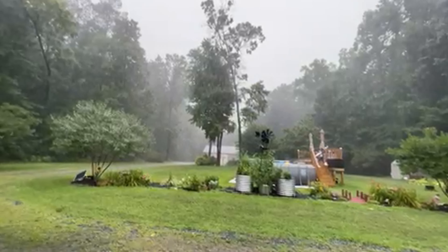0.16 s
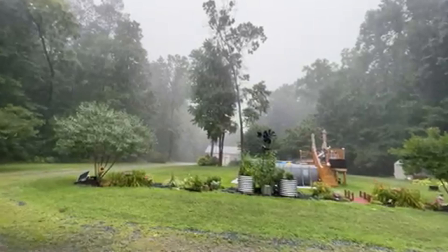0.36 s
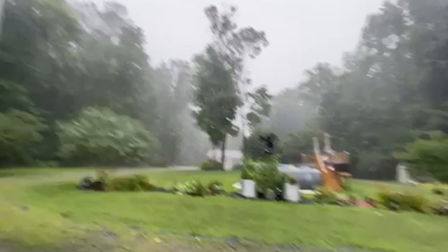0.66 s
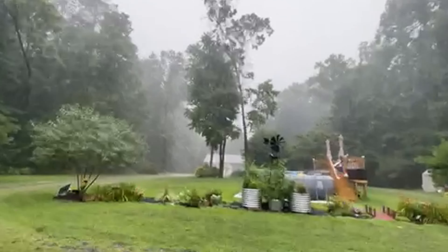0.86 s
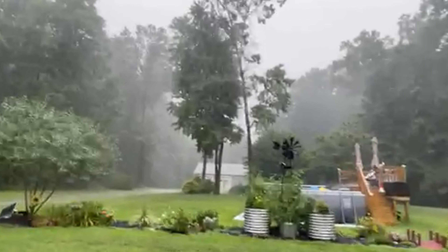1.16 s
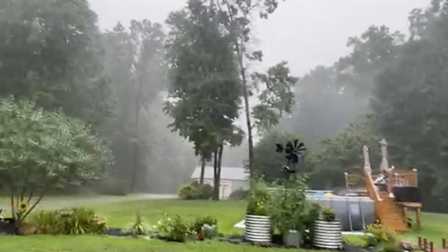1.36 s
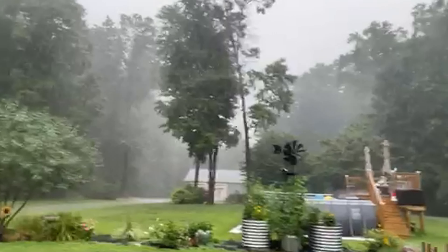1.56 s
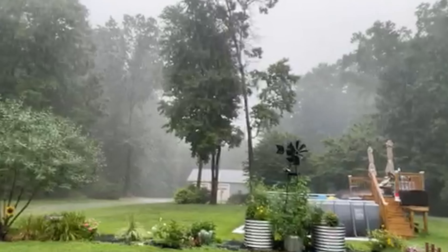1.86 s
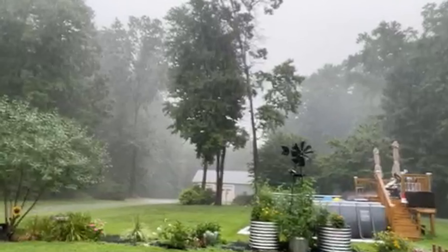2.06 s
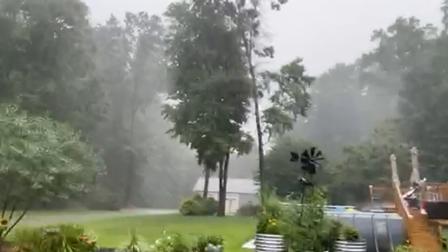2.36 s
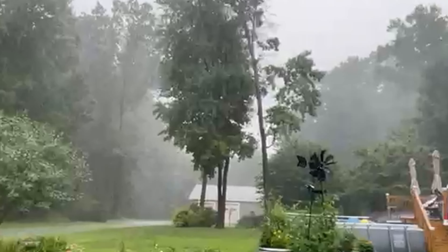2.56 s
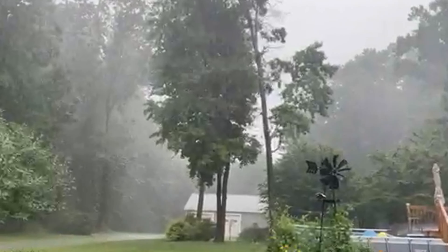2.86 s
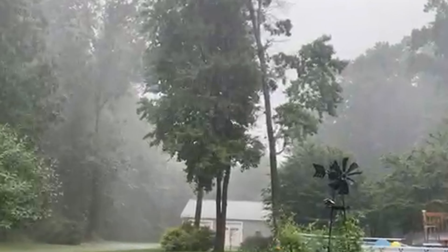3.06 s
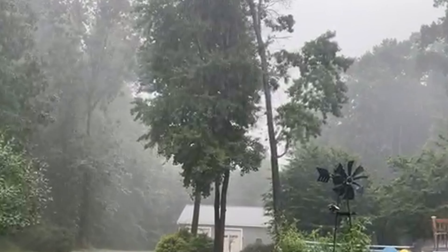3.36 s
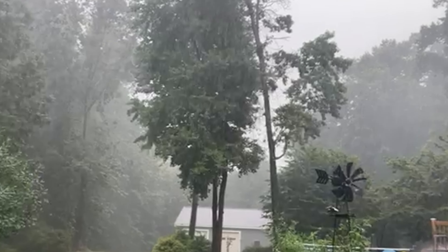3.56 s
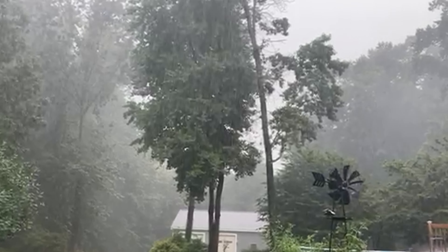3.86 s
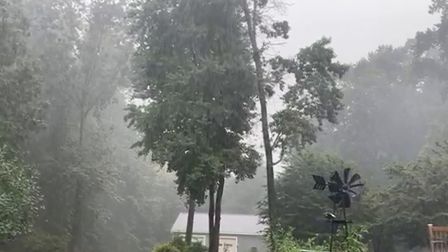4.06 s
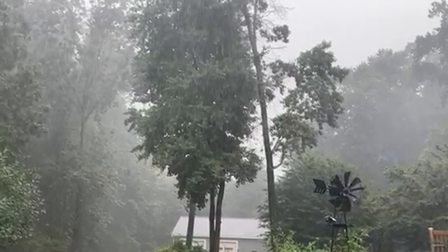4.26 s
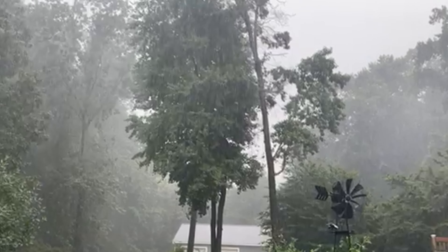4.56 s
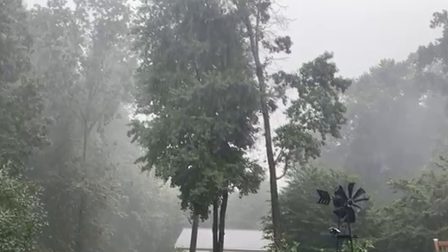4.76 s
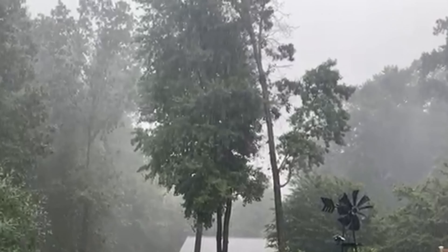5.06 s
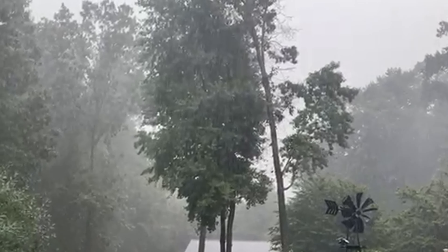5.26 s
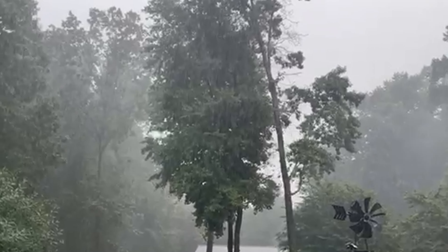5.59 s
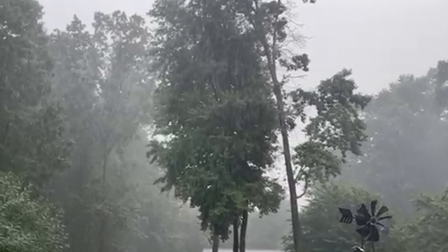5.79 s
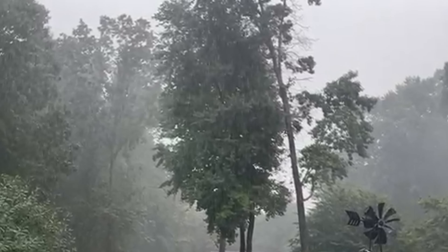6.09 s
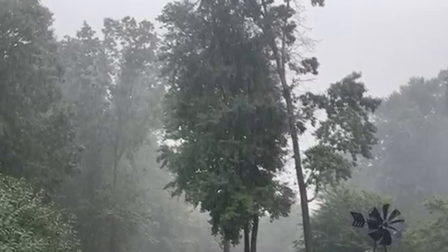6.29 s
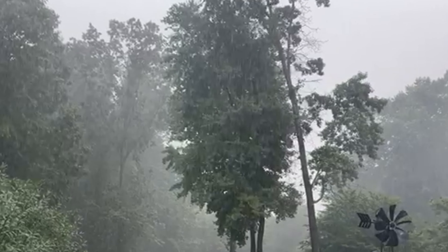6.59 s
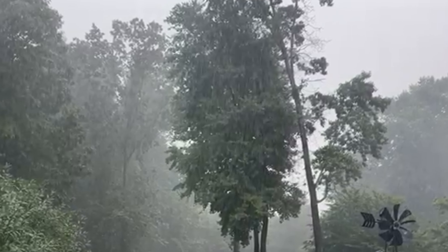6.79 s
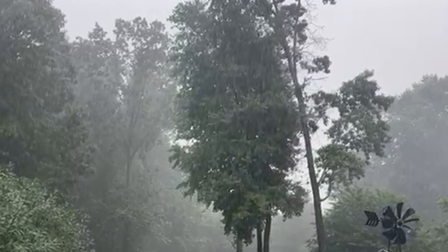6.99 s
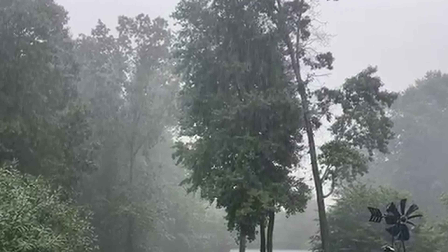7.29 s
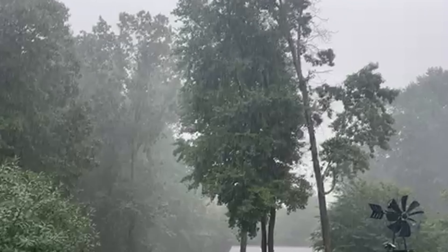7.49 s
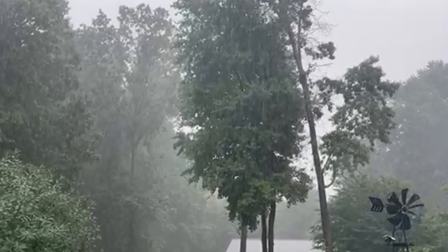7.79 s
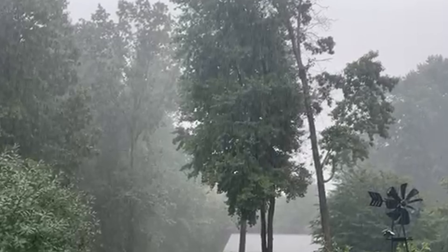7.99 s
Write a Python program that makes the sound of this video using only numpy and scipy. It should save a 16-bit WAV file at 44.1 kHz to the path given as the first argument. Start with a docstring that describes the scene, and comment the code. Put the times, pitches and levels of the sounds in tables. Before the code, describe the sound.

Heavy rain hisses steadily on a lawn and trees over a low roar, with a few ringing gutter drips.

```python
"""A downpour on lawn, gravel and trees, heard from under a porch through a phone's microphone array.
Countless impacts superpose into a hiss, bubbles ring in puddles, and a low roar swells beneath as
water drums on the roof. Run-off splashes close by on the right, drips ring the gutter, single drops tick.
The array narrows from a wide image to a forward beam: the splash fades and both sides grow alike."""
import sys
import numpy as np
from scipy import signal
from scipy.fft import rfft, irfft, next_fast_len
from scipy.io import wavfile
from scipy.ndimage import uniform_filter1d

SR = 44100
rng = np.random.default_rng(int(sys.argv[2]) if len(sys.argv) > 2 else 0)


def log_audio(samples):
    """Write samples as a 16-bit WAV file to the path given in sys.argv[1]."""
    # one column per channel
    frames = np.atleast_2d(samples).T
    # limit to full scale, then quantise
    limited = np.clip(frames, -1, 1)
    pcm = np.round(limited * 32767).astype(np.int16)
    wavfile.write(sys.argv[1], SR, pcm)


N = 358974
SIZE = next_fast_len(N, True)
HZ = np.maximum(np.arange(SIZE // 2 + 1) * SR / SIZE, 1)
RUMBLE_HZ, BOOM_HZ, TREBLE_HZ, TOP_HZ = 76.4, 169, 7280, 13000  # band edges

# The storm's strength. Each row: time in seconds, gains in dB of rain, roof drumming, boom and rumble.
STORM_GAINS = [(0.0, -18.5, -24, -24.5, -28), (.55, -16.5, -23, -33, -32), (.95, -15, -21.5, -27, -31),
               (1.27, -17.5, -22.5, -31, -34), (1.42, -16.5, -19.5, -22, -29),
               (1.7, -16, -19.5, -29.5, -27), (2.2, -14, -17.5, -23.5, -28),
               (2.7, -14.5, -17.5, -24.5, -21), (3.3, -16.5, -18.5, -27, -29.5),
               (3.7, -15, -18.5, -24, -32), (4.25, -15.5, -18.5, -26.5, -28),
               (4.6, -15.5, -19.5, -21, -28.5), (5.0, -15, -18.5, -21, -30), (5.25, -15, -18.5, -24, -30),
               (5.5, -16, -17, -22, -28), (5.7, -15, -15.5, -17.5, -32), (6.1, -16.5, -18, -26.5, -22),
               (6.3, -16, -17.5, -20, -25), (6.5, -16, -14, -15, -24), (6.72, -16.5, -17, -14.5, -25),
               (6.85, -15.5, -18.5, -21, -24.5), (7.3, -15, -16, -20, -23.5), (7.6, -16, -20.5, -21.5, -30),
               (8.02, -14.5, -16, -16.5, -34), (8.14, -18.5, -23, -22, -33)]
# The array's aim. Each row: time in seconds, focus (0 wide, 1 narrow), treble focus, splash gain in dB.
BEAM_AIM = [(0, 0, 0, -17.5), (.7, 0, 0, -15.5), (1.2, 0.01, 0.4, -19), (1.4, 0.027, 1, -20),
            (2.0, 0.15, 1, -18.5), (2.4, 0.22, 0.94, -16.5), (2.9, 0.99, 0.98, -62), (3.5, 1, 1, -57),
            (8.14, 1, 0.95, -60)]
# The hiss. Each row: frequency in Hz, relative spectral level in dB when wide, the same when narrow.
RAIN_SPECTRUM = [(198, -16.5, -22.5), (498, -1.5, 0), (810, -1, -4), (930, -1.5, -2), (1460, 0, -3.5),
                 (1465, -1, -3), (1640, -1, -3.5), (2720, -5, -1.5), (3760, -8.5, -6.5),
                 (5330, -10.5, -7.5), (6400, -10.5, -9), (8050, -11.5, -12), (10000, -13.5, -11),
                 (12000, -15.5, -15), (13300, -22, -17.5), (15100, -19, -20.5)]
# Likeness of the two ports. Each row: frequency in Hz, coherence (0 to 1) when wide, the same when narrow.
COHERENCE = [(30, .7, 0.86), (60, 1, 1), (231, 0.83, 0.95), (400, 0.62, 0.88), (680, 0.07, 0.61),
             (1320, 0, 0.13), (1990, 0, 0.56), (2600, 0, 0.92), (3300, 0.06, 1), (4970, 0.34, 1),
             (5600, 0.3, 0.86), (6100, 0.5, 0.68), (6620, 0.85, 1), (7800, 1, 1), (9600, 0.4, 1),
             (9500, 0.6, 0.2), (9900, 0.6, 1), (10200, 0.96, 1), (12200, 1, 0.8), (12800, .5, 0.6)]
# The highest hiss loosens late. Each row: time in seconds, coherence (0 to 1).
TOP_COHERENCE = [(0, 1), (3.3, 0.97), (3.6, 0.25), (6.4, 0.6), (6.8, 0), (8.14, 0)]
# Phase of the sound both ports share. Each row: frequency in Hz, lead of the right port in half turns.
PORT_PHASE = [(2500, 0), (5000, 0), (5500, 0.43), (6300, 0.32), (6900, 1), (8800, 1), (9300, 0.48),
              (10000, 0.6), (10400, 0), (12250, 0), (12800, -0.59), (13500, -1)]
# Balance of the ports. Each row: frequency in Hz, left minus right in dB.
PORT_BALANCE = [(60, 0), (120, -2), (400, -0.5), (900, -1), (2000, 3), (3000, 0)]
# Resonances of the porch. Each row: frequency in Hz, width in Hz, peak gain in dB.
PORCH_MODES = [(126, 26, 5), (404, 18, 6), (520, 25, 2.5), (745, 60, 2), (1535, 70, 3.5), (2200, 140, 2)]
# The roar, before its roll-off and band gains. Each row: frequency in Hz, relative spectral level in dB.
ROAR_SPECTRUM = [(13, -50), (24, -19), (63, -2), (120, -2), (174, -4.5), (212, -1.5), (338, -3), (408, -6),
                 (469, -8), (735, -9.5), (830, -32), (1170, -50), (1980, -120)]
# Run-off on gravel. Each row: frequency in Hz, relative spectral level in dB.
SPLASH_SPECTRUM = [(300, -42), (900, 2.5), (2000, -5), (3500, -2), (4600, -2.5), (5600, 2.5), (7000, -0.5),
                   (8500, -1), (11000, -39)]
# Acoustic shadow on the splash. Each row: frequency in Hz, gain at the far port in dB.
FAR_PORT_SHADOW = [(500, -4), (2000, -5.5), (4000, -19), (6000, -23)]
# Heavy drips on the gutter. Each row: start in seconds, level in dB, left minus right in dB.
DRIP_IMPACTS = [(.86, -36, 2), (2.275, -19, 8), (2.41, -24, 3), (2.6, -18, 4), (2.69, -19, 7),
                (3.04, -25, 6), (3.68, -22, 6), (4.95, -28, 3), (5.2, -35, 3)]
# Modes of the gutter. Each row: frequency in Hz, gain in dB, 60 dB decay time in seconds.
GUTTER_MODES = [(1505, 0, .35), (1550, -1, .35), (1880, -7, .25)]
# Brief dips in the level. Each row: start in seconds, depth in dB.
LEVEL_DIPS = [(1.06, 1), (1.74, 3), (2.06, 1.5), (3.17, 1.5), (3.35, -0.5), (4.295, 2.5), (5.52, 0),
              (6.34, 0.5), (6.53, 1), (6.87, 1.5), (7.1, 0.5), (7.54, 1.5)]
# Single drops close by. Each row: start in seconds, level in dB, left minus right in dB.
TICK_IMPACTS = [(3.7078, -11, 5), (4.2922, -9, 3), (5.899, -24, 0), (3.757, -19, 0), (4.7252, -23, 0),
                (7.0793, -18, 0.5)]
# Modes of a tick. Each row: frequency in Hz, gain in dB, 60 dB decay time in seconds.
TICK_MODES = [(10800, 3, 0.0064), (12800, -1, .003), (14800, -3, .003)]


def from_db(db):
    """Amplitude grows tenfold for every 20 dB."""
    return 10 ** (np.asarray(db) / 20)


def unit_rms(x):
    """Normalisation to a mean power of one."""
    return x / np.sqrt(np.mean(x ** 2) + 1e-20)


def in_time(rows):
    """Linear interpolation of each column over time."""
    times, *columns = np.transpose(rows)
    return [np.interp(np.arange(N) / SR, times, column) for column in columns]


def at_hz(rows, hz, column=1):
    """Interpolation of one column over log frequency."""
    rows = np.array(rows)
    return np.interp(np.log(hz), np.log(rows[:, 0]), rows[:, column])


def drift(corner_hz):
    """Low-passed noise less its running mean gives a random fluctuation of unit spread."""
    step, run_in, mean_s = 40, 2000, .13
    pole = np.exp(-2 * np.pi * corner_hz * step / SR)
    noise = rng.standard_normal(N // step + run_in + 2)
    slow = signal.lfilter([1], [1, -2 * pole, pole * pole], noise)[run_in:]
    slow -= uniform_filter1d(slow, size=int(mean_s * SR / step))
    return np.interp(np.arange(N) / step, np.arange(len(slow)), unit_rms(slow))


def impact_spectra(per_s, spread_db, channels):
    """Shot noise: spectra of independent impacts of random sign, most small and a few large."""
    size, sign, chance = rng.random((3, channels, N))
    heights = from_db(spread_db * np.minimum(-np.log(size + 1e-9), 5)) * np.sign(sign - .5)
    return rfft(unit_rms(heights * (chance < per_s / SR)), SIZE)


def port_fields(colour_db):
    """Porch resonance colours the drops: a left-right pair of shared spectra, then an independent pair."""
    shared, left, right = impact_spectra(14000, spread_db=2.0, channels=3)
    twist = np.exp(.5j * np.pi * at_hz(PORT_PHASE, HZ))
    lean = from_db(at_hz(PORT_BALANCE, HZ) / 2)
    porch_db = sum(peak_db / (1 + (2 * (HZ - hz) / width) ** 2) for hz, width, peak_db in PORCH_MODES)
    fields = np.array([shared / twist * lean, shared * twist / lean, left * lean, right / lean])
    return from_db(colour_db + porch_db) * fields


def blend(fields, coherence):
    """Partial coherence: the shared and the independent pair add in power."""
    coherence = np.clip(coherence, 0, 1)
    return np.sqrt(coherence) * fields[:2] + np.sqrt(1 - coherence) * fields[2:]


def rain_hiss(focus, treble_focus, patch_db, gust_db):
    """Impacts superpose into hiss; the array's directivity sets each band's colour and coherence."""
    fields = port_fields(at_hz(RAIN_SPECTRUM, HZ, column=2))
    out, gust = np.zeros((2, N)), drift(22)
    centres = 700 * np.expm1(np.linspace(.2, 3.2, 36))
    for k, hz in enumerate(centres):
        low, high = np.searchsorted(HZ, [centres[k - 1] if k else 0, centres[min(k + 1, 35)] + 1])
        band = np.zeros_like(fields)
        band[:, low:high] = fields[:, low:high] * np.interp(HZ[low:high], centres, np.arange(36) == k)
        band = irfft(band, SIZE)[:, :N]
        wide, narrow = at_hz(COHERENCE, hz), at_hz(COHERENCE, hz, column=2)
        # Short waves are steered first.
        aim = treble_focus if hz > TREBLE_HZ else focus ** (.4 if hz > 3300 else 1)
        coherence = in_time(TOP_COHERENCE)[0] if hz > TOP_HZ else wide + aim * (narrow - wide)
        tint_db = (1 - focus) * (at_hz(RAIN_SPECTRUM, hz) - at_hz(RAIN_SPECTRUM, hz, column=2))
        # Gusts shake the treble together, patches of rain each band alone.
        treble_weight = min(hz / 9000, 1) ** 0.26
        flicker_db = treble_weight * (gust_db * gust + patch_db * drift(15)) + 1.06 * drift(6.8)
        out += from_db(tint_db + flicker_db) * blend(band, coherence)
    return unit_rms(out)


def ring(impulses, hz, t60):
    """A damped oscillator answers a unit impulse with a decaying sine of height one."""
    pole, angle = from_db(-60 / (t60 * SR)), 2 * np.pi * hz / SR
    return signal.lfilter([0, np.sin(angle)], [1, -2 * pole * np.cos(angle), pole * pole], impulses + 1e-18)


def puddle_bubbles(focus, per_s, decay_cycles):
    """Bubble resonance: big drops trap air that rings briefly, in clumps, each from its own side."""
    chance, size, place, pitch = rng.random((4, N))
    born = chance < per_s * from_db(2.5 * drift(9)) / SR
    heights = born * from_db(-3.0 * np.log(size + 0.023))
    pan = 0.52 * (1 - focus) * (place - .5)
    impulses = heights * np.sqrt([.5 + pan, .5 - pan])
    pitch_index, out = (pitch * 30).astype(int), np.zeros((2, N))
    for k, hz in enumerate(np.geomspace(800, 5200, 30)):
        out += ring(impulses * (pitch_index == k), hz, decay_cycles / hz) * np.sqrt(hz / 2500)
    return unit_rms(out)


def roof_roar(focus, drumming_db, boom_db, rumble_db):
    """Water drums on the roof over a boom and a rumble; long waves reach both ports nearly in phase."""
    roll_off_db = 30 * np.log2(np.maximum(HZ / 900, 1))
    fields = port_fields(at_hz(ROAR_SPECTRUM, HZ) - roll_off_db)
    deep, lowest = 1 / (1 + (HZ / BOOM_HZ) ** 4), 1 / (1 + (HZ / RUMBLE_HZ) ** 6)
    bands = lowest, deep * (1 - lowest), 1 - deep
    gains = [from_db(level_db + drift(4.6)) for level_db in (rumble_db, boom_db, drumming_db)]
    out = np.zeros((2, N))
    for weight, column in (1 - focus, 1), (focus, 2):
        pair = blend(fields, at_hz(COHERENCE, HZ, column))
        for band, gain in zip(bands, gains):
            out += weight * gain * unit_rms(irfft(band * pair, SIZE)[:, :N])
    return out


def runoff_splash(treble_focus):
    """Run-off hits gravel on the right; path difference delays it at the left port, shadowing dulls it."""
    lag_s = 0.000413
    near = impact_spectra(6000, spread_db=1.0, channels=1)[0] * from_db(at_hz(SPLASH_SPECTRUM, HZ))
    far = near * from_db(at_hz(FAR_PORT_SHADOW, HZ)) * np.exp(-2j * np.pi * HZ * lag_s)
    pair, high_pass = np.array([far, near]), 1 / (1 + (TREBLE_HZ / HZ) ** 24)
    whole, sizzle = irfft([pair, pair * high_pass], SIZE)[..., :N]
    in_beam = whole - treble_focus * sizzle  # the beam drops the sizzle first
    return in_beam / np.std(whole) * from_db(drift(8.3))


def drop_strikes(impacts, modes):
    """Modal superposition: each drop, placed between left and right, rings the modes of what it hits."""
    start_s, level_db, pan_db = np.transpose(impacts)
    impulses = np.zeros((2, N))
    impulses[:, (start_s * SR).astype(int)] = from_db(level_db + np.outer([.5, -.5], pan_db))
    return sum(from_db(mode_db) * ring(impulses, hz, t60) for hz, mode_db, t60 in modes)


def level_dips(fall_s, return_s):
    """Amplitude modulation in dB: the level falls quickly and returns more slowly, on Gaussian flanks."""
    t, gain_db = np.arange(N) / SR, np.zeros(N)
    for start_s, depth_db in LEVEL_DIPS:
        from_trough = t - start_s - fall_s
        width_s = np.where(from_trough < 0, fall_s / 2, return_s)
        gain_db -= depth_db * np.exp(-(from_trough / width_s) ** 2)
    return gain_db


def limiter(x, limit_db, release_db_per_s, attack_s):
    """Peak limiting: excess level pulls the gain down quickly, and it climbs back at a steady rate."""
    over_db = np.maximum(20 * np.log10(np.abs(x).max(axis=0) + 1e-9) - limit_db, 0)
    climb_db = release_db_per_s * np.arange(N) / SR
    held_db = np.maximum.accumulate(over_db + climb_db) - climb_db
    pole = np.exp(-1 / (attack_s * SR))
    return x * from_db(-signal.lfilter([1 - pole], [1, -pole], held_db))


def scene():
    """Linear superposition: the pressures of all the sources add at each port."""
    rain_db, drumming_db, boom_db, rumble_db = in_time(STORM_GAINS)
    focus, treble_focus, splash_db = in_time(BEAM_AIM)
    hiss = from_db(3.0) * rain_hiss(focus, treble_focus, patch_db=0.68, gust_db=0.25)
    bubbles = from_db(-15.5) * puddle_bubbles(focus, per_s=500, decay_cycles=180)
    dip_db, surge_db = level_dips(fall_s=0.013, return_s=0.082), 0.12 * drift(14.5)
    shower = from_db(rain_db + dip_db + surge_db) * (hiss + bubbles)
    roar = from_db(0.15 * dip_db) * roof_roar(focus, drumming_db, boom_db, rumble_db)
    splash = from_db(splash_db) * runoff_splash(treble_focus)
    gutter = drop_strikes(DRIP_IMPACTS, GUTTER_MODES)
    ticks = drop_strikes(TICK_IMPACTS, TICK_MODES)
    return shower + roar + splash + gutter + ticks


def record(dry):
    """Band limiting and saturation: the ports lose the lowest air, peaks duck and round, the top is cut."""
    low_cut = signal.butter(2, 31, "high", fs=SR, output="sos")
    high_cut = signal.ellip(12, .5, 70, 15850, fs=SR, output="sos")
    limited = limiter(signal.sosfilt(low_cut, dry), limit_db=-0.31, release_db_per_s=34.5, attack_s=0.0047)
    rounded = limited / (1 + np.abs(limited / 1.02) ** 8) ** (1 / 8)
    return np.clip(signal.sosfilt(high_cut, rounded), -1, 1)


dry = scene()
out = record(dry)
log_audio(out)
```